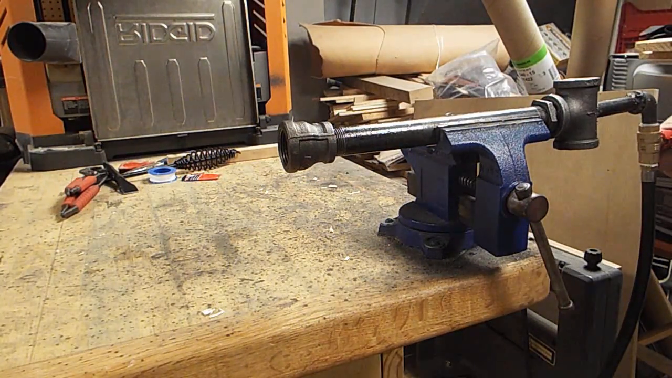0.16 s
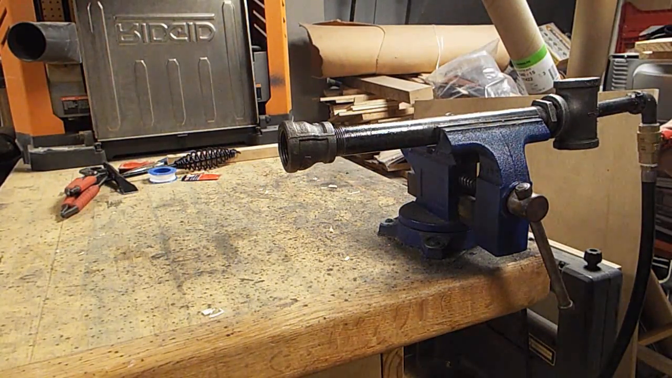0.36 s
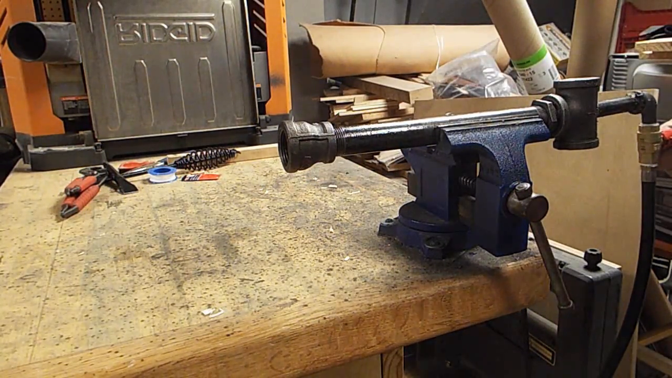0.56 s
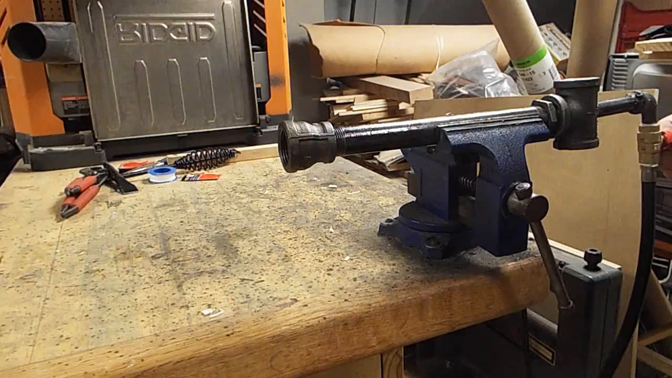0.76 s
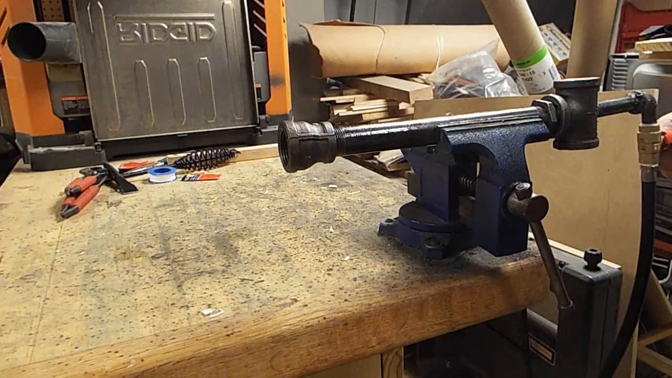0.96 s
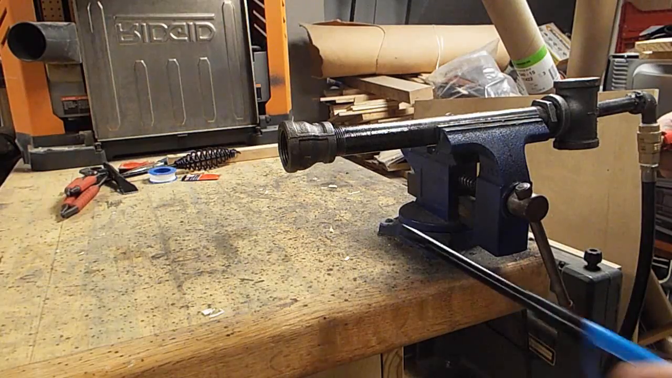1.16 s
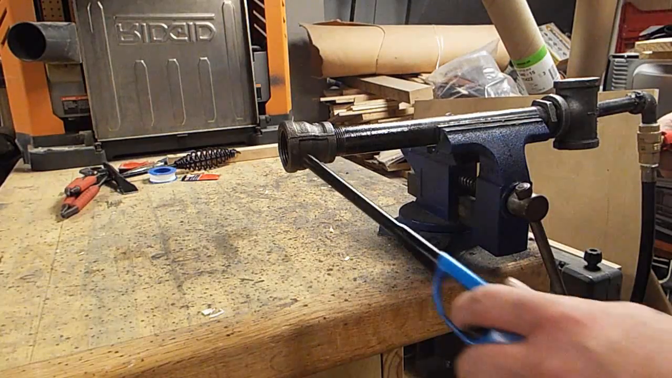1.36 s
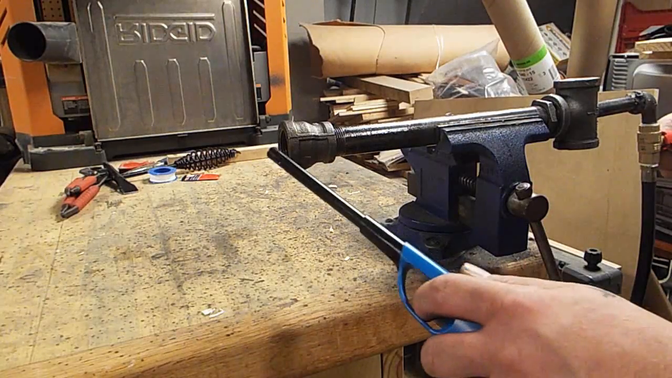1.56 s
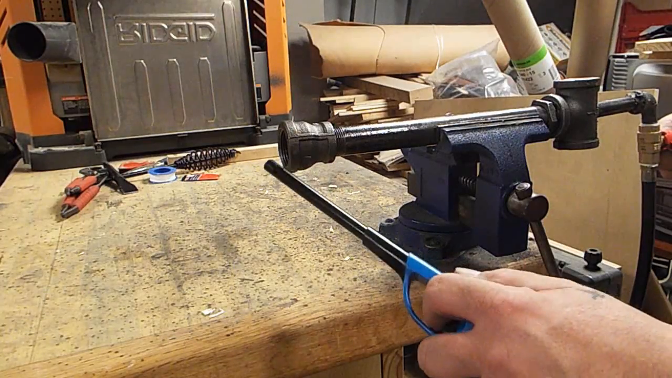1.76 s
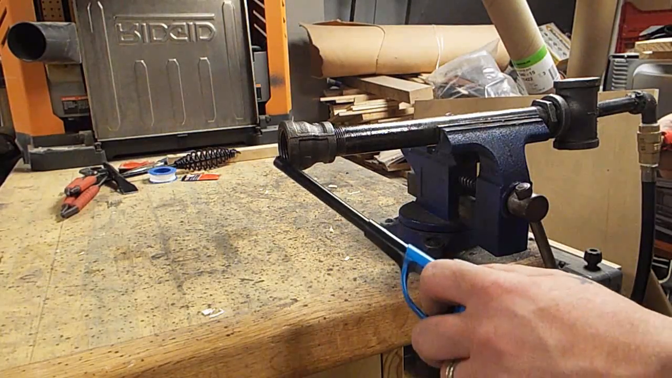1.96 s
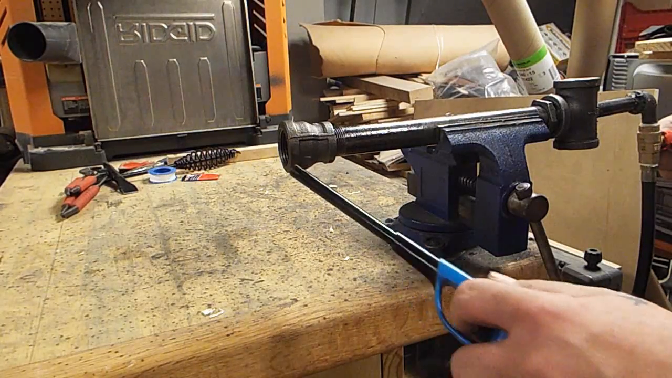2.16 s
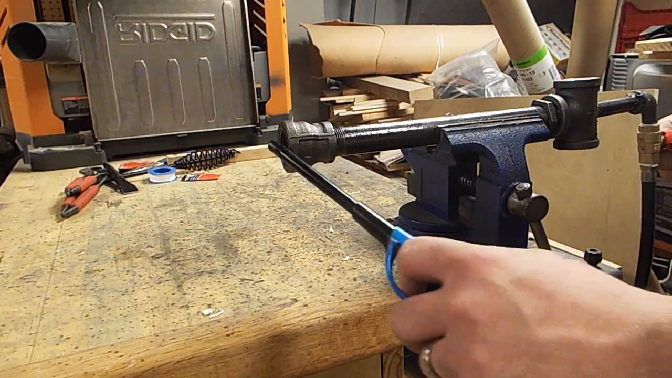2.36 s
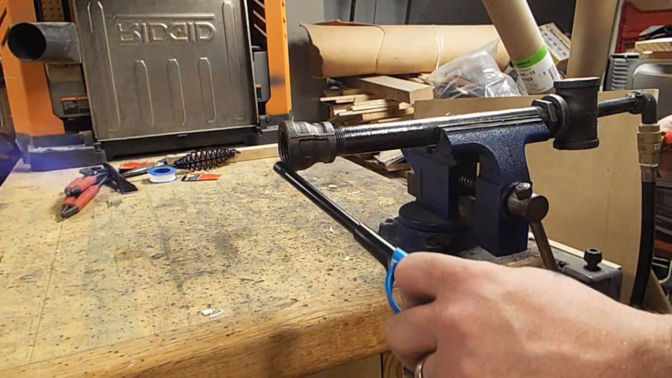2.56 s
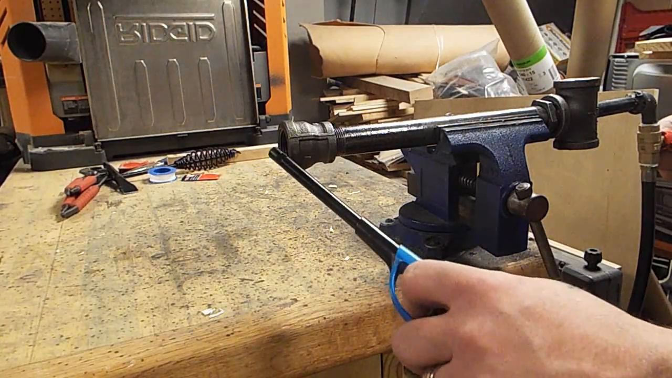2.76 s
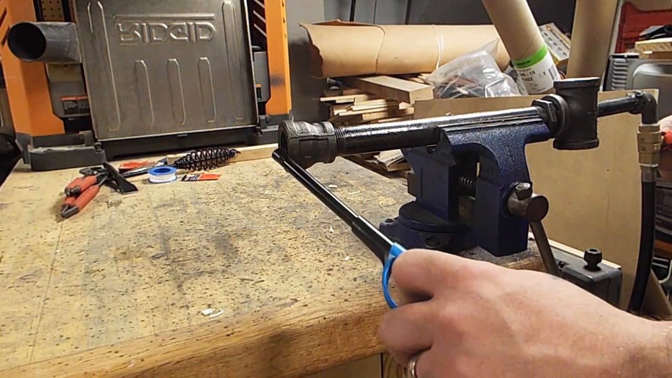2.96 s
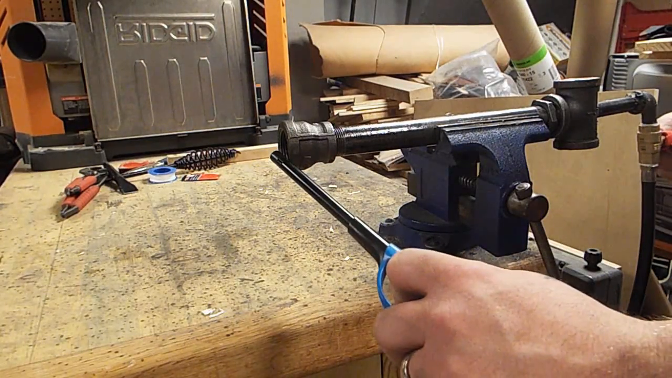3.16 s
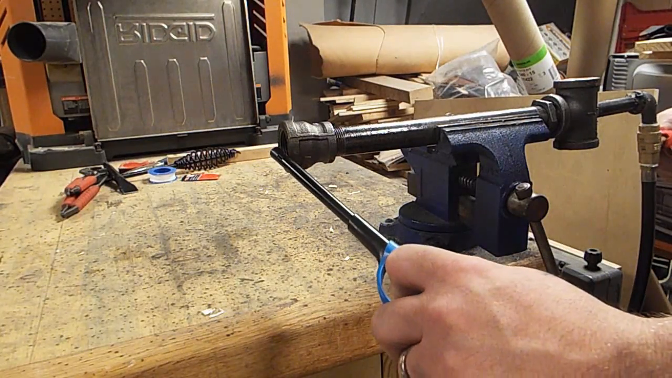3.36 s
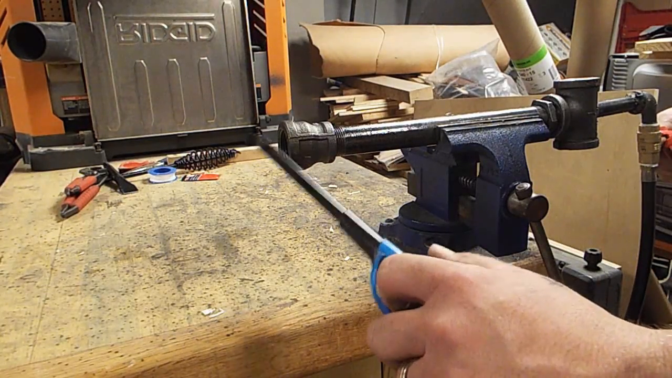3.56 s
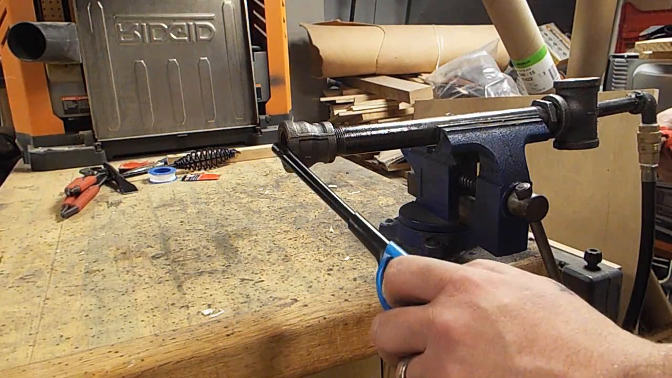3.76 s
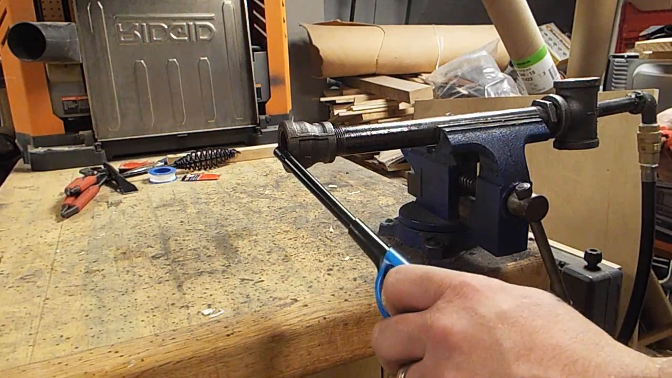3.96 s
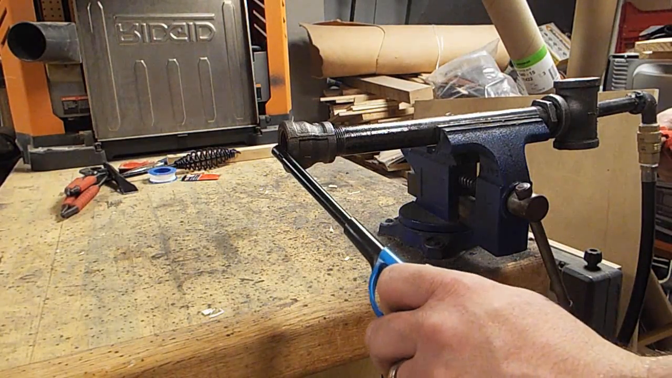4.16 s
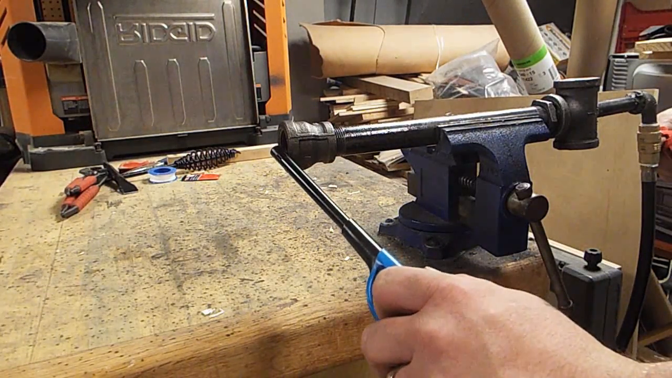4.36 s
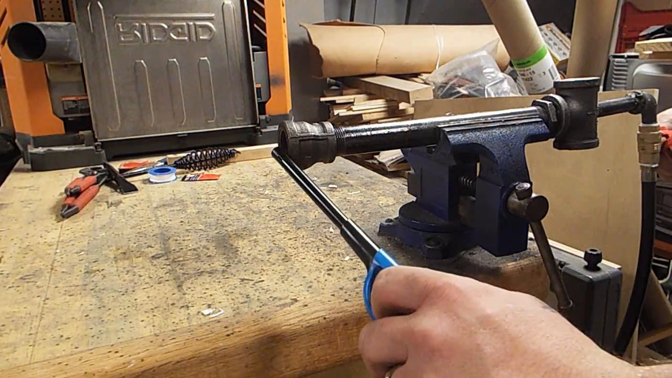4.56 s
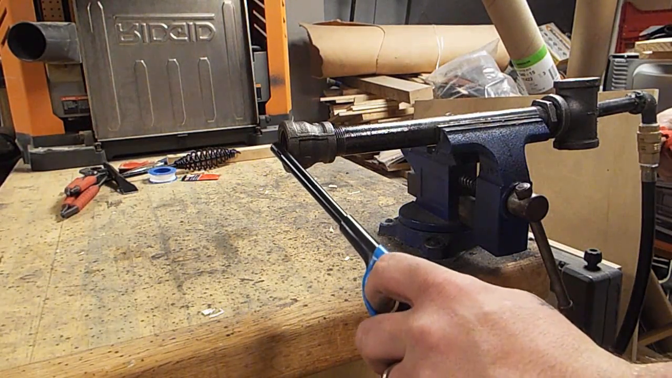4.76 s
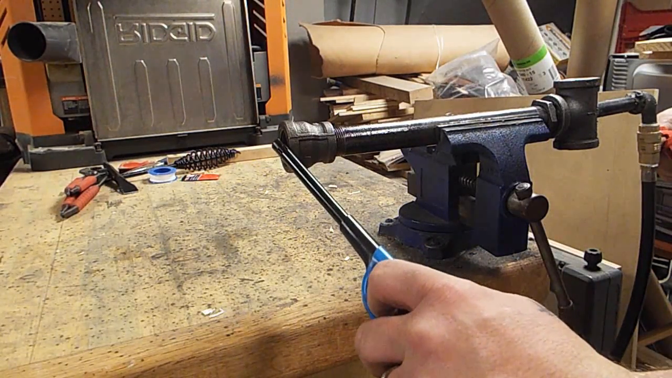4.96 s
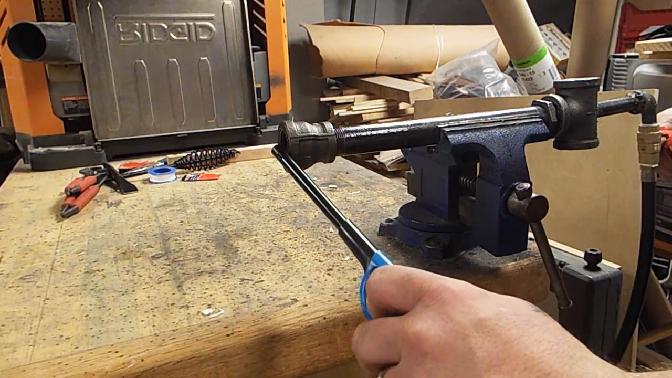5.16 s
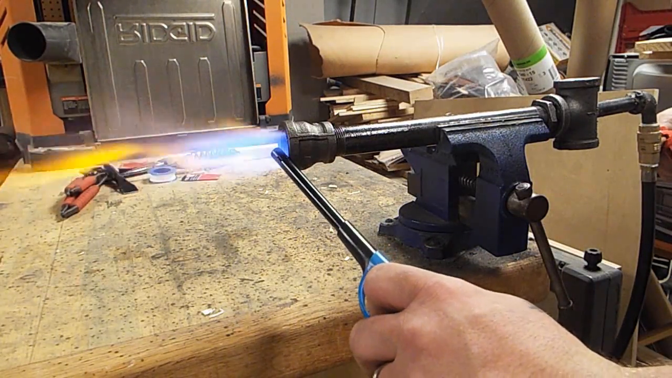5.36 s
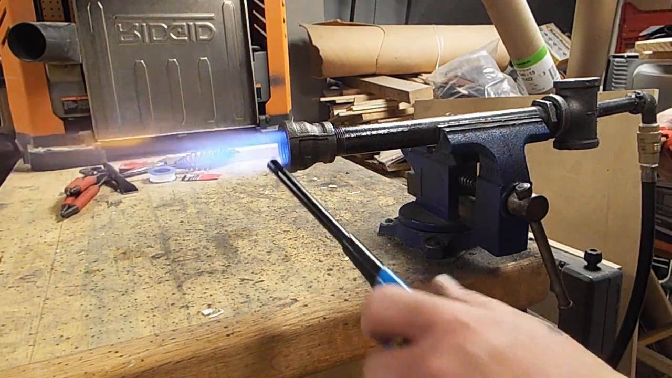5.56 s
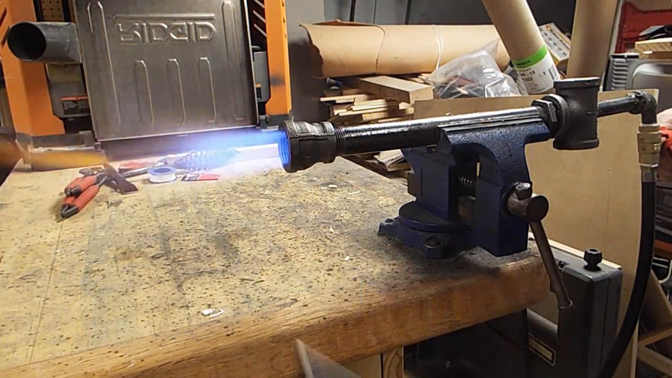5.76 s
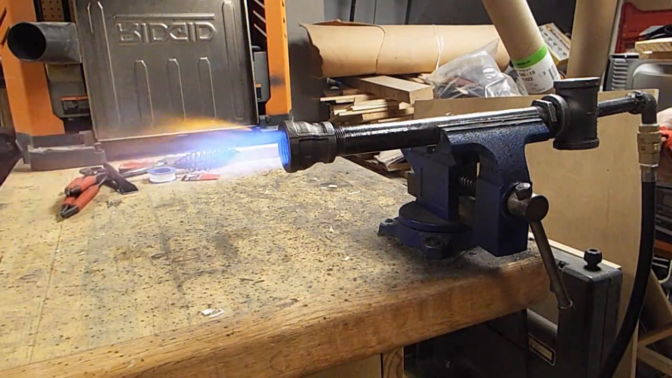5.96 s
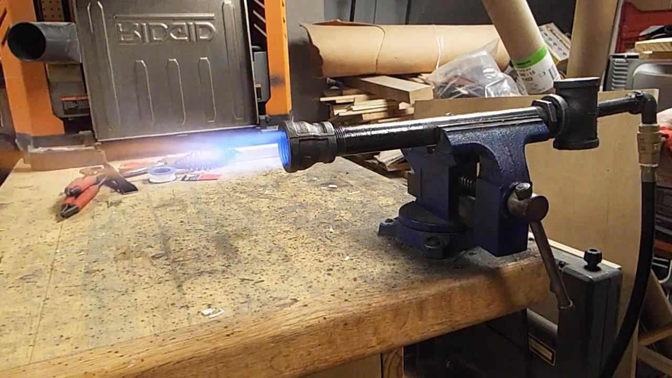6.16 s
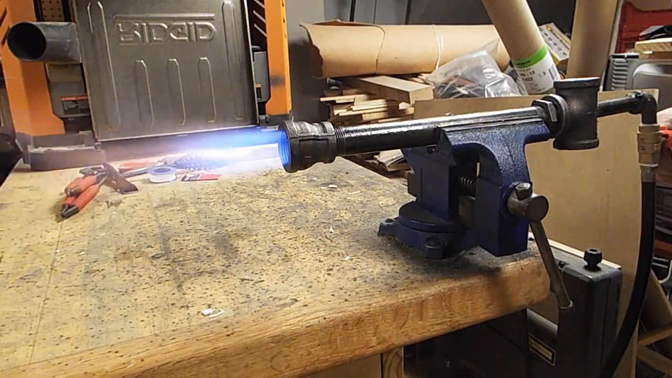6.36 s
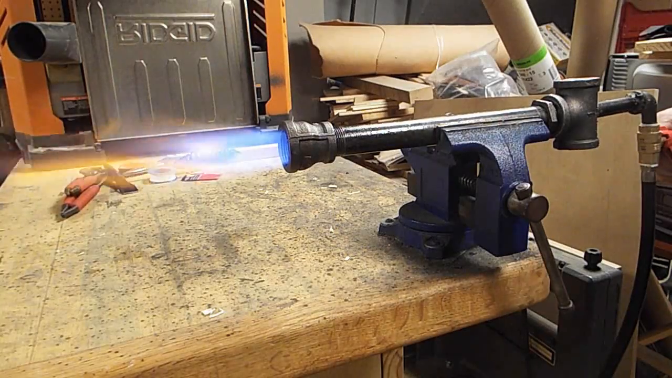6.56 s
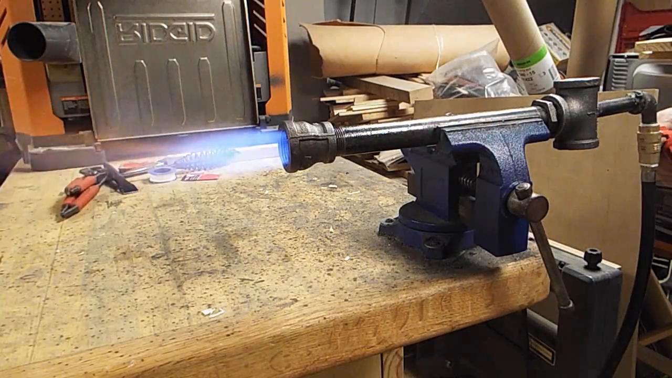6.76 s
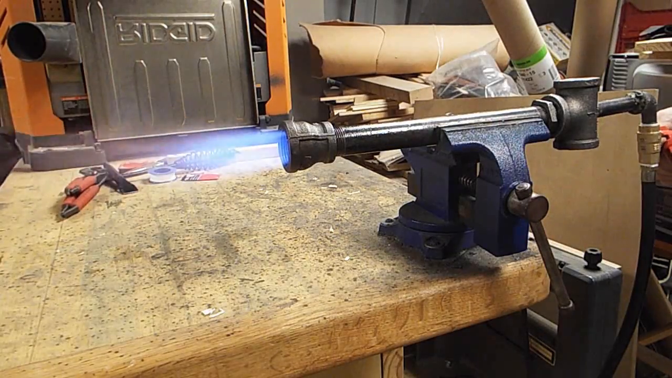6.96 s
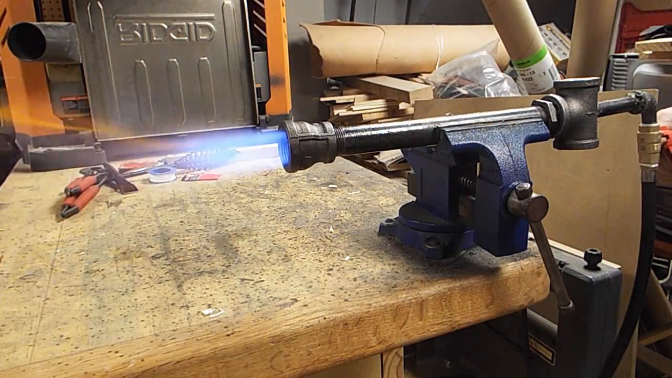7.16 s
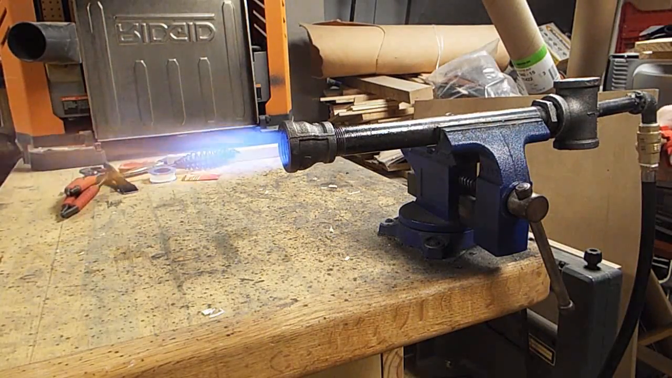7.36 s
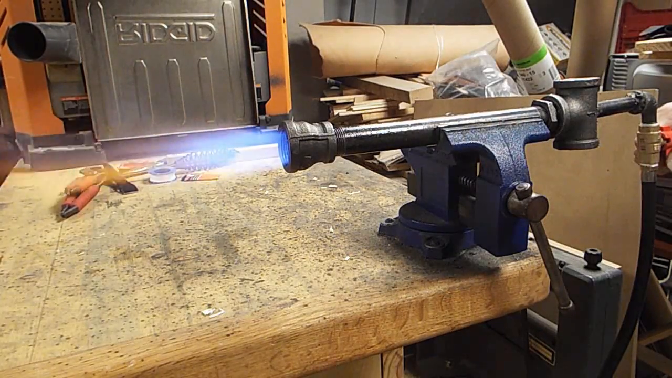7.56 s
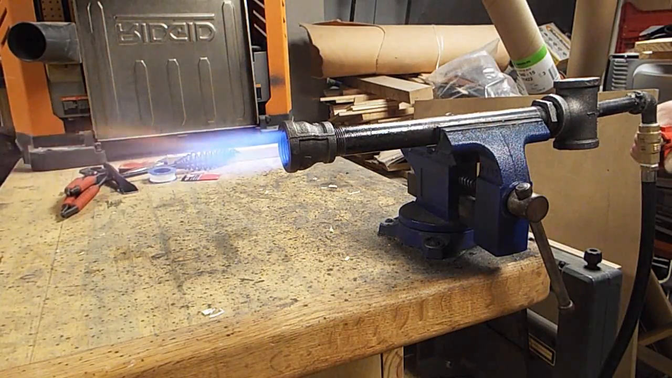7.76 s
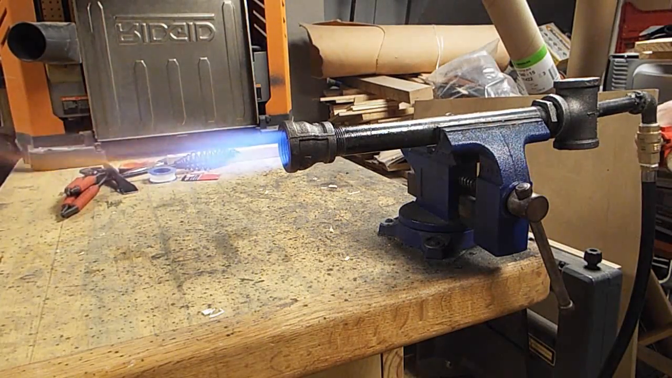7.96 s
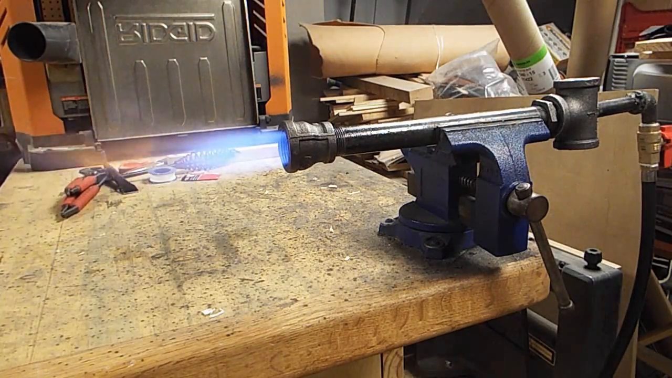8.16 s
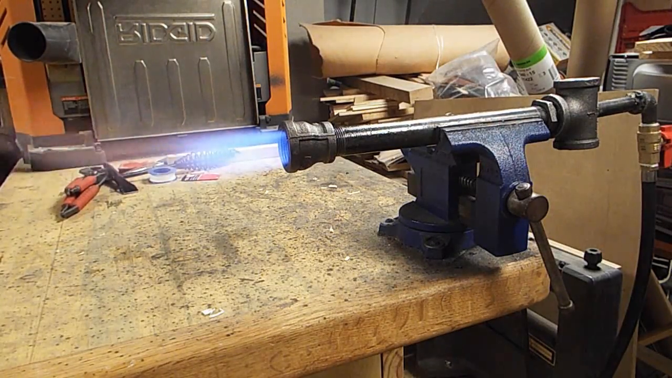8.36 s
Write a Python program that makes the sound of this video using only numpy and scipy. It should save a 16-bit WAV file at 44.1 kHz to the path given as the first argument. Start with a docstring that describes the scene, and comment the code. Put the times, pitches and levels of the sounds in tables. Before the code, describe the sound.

Close up in a small cluttered workshop, faint seeping gas turns into a steady airy hiss. A metallic tap, then a crisp lighter snap and a puff of fire that dies quickly. More trigger scrapes, ticks and snaps bring two more brief whooshes. At last the gas ignites with a low whump and burns in a powerful, steady, rough roar to the end, masking everything else.

```python
"""A gas burner, a pipe clamped in a bench vise, is lit with a piezo lighter in a small workshop.
Gas seeps faintly, then the valve opens and it hisses: noise shaped by the ringing pipe.
The lighter's wand knocks on the burner; its trigger slides, ticks and snaps (blows through a plastic body).
Three snaps light a flame that flares and blows out; the fourth holds and roars (noise that rises and flutters).
Room tone lies under it all, and the workshop answers each click with a short, dense echo."""
import sys
import numpy as np
from scipy import signal
from scipy.fft import rfft, irfft, next_fast_len
from scipy.io import wavfile
from scipy.ndimage import map_coordinates

SR = 44100
rng = np.random.default_rng(int(sys.argv[2]) if len(sys.argv) > 2 else 0)


def file_out(sig):
    """Save sig as 16-bit WAV at sys.argv[1]."""
    # one column per channel
    cols = np.atleast_2d(sig).T
    # limit, then scale
    lim = np.clip(cols, -1, 1)
    pcm = np.round(lim * 32767).astype(np.int16)
    wavfile.write(sys.argv[1], SR, pcm)


N = 371410

# Noise and click spectra are relative: their sounds are scaled to a common size before their level is set.

# The burn each spark lights; delays count from the spark, flares from the catch:
# catch_delay_s, burn_s, roar_db, rush_db, flare_delay_s, flare_db, flare_width_s
BURNS = [(0.02, 0.065, -27.5, -35, 0.054, 7.5, 0.015), (0.0042, 0.11, -23.5, -31, .011, 3, 0.036),
         (0.0092, 0.03, -22, -32, .021, 2, 0.015), (0.0037, 4, -21, -28, .029, 1.5, .45)]
# Turbulent burning: pitch_hz, level_db (per Hz)
FLAME_SPECTRUM = [(20, -32), (80, 0.0), (170, -14), (400, -10.5), (650, -30), (1200, -21), (2000, -13),
                  (3000, -18.5), (5000, -16.5), (6300, -18.5), (7300, -26), (11000, -33), (15600, -49.5)]
# Peaks and dips from the bench and nearby walls: pitch_hz, width_hz, level_db
BENCH_PEAKS = [(167.3, 74, 21.5), (244.7, 40, 13), (340.5, 135, 13), (532.4, 139.5, 19.5), (734, 221, 22.5),
               (908, 19, 12), (1037, 157, 22), (1052.5, 45, -23), (1188, 44, 11), (1277, 41, 8.5),
               (1387, 50, 6.5), (1515, 300, 6.5), (1744, 52, 7), (1910, 76, 6), (2150, 71, 5),
               (2345, 44, 4.4), (2494, 18, 8), (2750, 34, 8.5), (2937, 84, 8.5), (3306, 51, 10.5),
               (3460, 99, 4.5)]
# Stereo spread of the flame: pitch_hz, side_minus_mid_db
FLAME_WIDTH = [(50, -24), (200, -28.5), (700, -31), (1300, -65), (2400, -31), (3700, -18), (5600, -13.5),
               (8500, -13), (13000, -8.5)]
# Air pushed out as the gas catches: pitch_hz, level_db (per Hz)
THUMP_SPECTRUM = [(2, -50), (20, -12), (35, 1), (80, -2.5), (125, -3.5), (170, 4.5), (225, -4.5),
                  (300, -13), (400, -19), (1000, -90)]
# Air swirling after a blow-out: pitch_hz, level_db (per Hz)
DRAUGHT_SPECTRUM = [(2, -30), (9, -4), (16, -2), (30, -17), (70, -30), (300, -70)]
# Every flame catches (time constant) and dies (time to fall 60 dB) alike
CATCH_S, DYING_T60_S = 0.0035, .175
# Thump: level over the roar, time to fall 60 dB
THUMP_DB, THUMP_T60_S = 0.5, 0.86
# The hot puff rolls away: level, time from the end of the burn to its strongest, width
DRAUGHT_DB, DRAUGHT_LAG_S, DRAUGHT_WIDTH_S = -51.5, 0.15, 0.21

# Gas hiss before the pipe shapes it: pitch_hz, level_db (per Hz)
JET_SPECTRUM = [(300, -6.5), (480, -6), (800, -24.5), (1050, -13.5), (2200, -6.9), (3000, -6), (5000, -4),
                (6300, 0), (7300, -7.5), (10800, -6), (13000, -14.5), (15600, -25)]
# Peaks of the burner tube: pitch_hz, width_hz, level_db
PIPE_PEAKS = [(557, 75, 20), (763, 84, 12), (1067, 300, 10.5), (1098, 9.2, 16), (1556, 170, 12),
              (1915, 120, 10), (2249, 234, 12.5), (2580, 29, 12), (2755, 160, 9), (3240, 58, 9.5),
              (3720, 130, 8.5), (4000, 110, 3.5), (4193, 72, 13.5), (4400, 92, 8.5), (4760, 130, 10.5),
              (5170, 180, 11.5), (5640, 110, 10.5), (5830, 26, 14.5), (6240, 65, 10.5), (6500, 44, 11),
              (7370, 160, 5), (7827, 47, 7)]
# Stereo spread of the gas jet, also the basis for the echoes: pitch_hz, side_minus_mid_db
JET_WIDTH = [(400, -21), (1300, -25), (2400, -27), (3700, -14), (5600, -12.5), (8500, -8), (13000, -5.5)]
# Gas seeping before the valve opens: pitch_hz, level_db (per Hz)
SEEP_SPECTRUM = [(100, -24), (400, -1), (800, -6), (1080, 3), (1300, -1.5), (2300, 0.5), (3000, -1),
                 (5500, 0.5), (6500, -1), (7500, -18), (11000, -23), (16000, -28)]
# Valve: start of opening, time it takes, and level of the jet before its bass is cut
OPEN_S, OPENING_S, HISS_DB = 0.677, .15, -45.4
# Pressure stored in the hose adds a surge that settles (time constant)
SURGE_DB, SETTLE_S = 1.5, 0.26
# Seeping: level, rise time constant
SEEP_DB, SEEP_RISE_S = -66, 0.024
# The seeping swells once as the valve is turned: time, width, boost
SWELL_S, SWELL_WIDTH_S, SWELL_DB = .39, 0.087, 6.5

# The piezo hammer fires: start_s, level_db
SPARKS = [(1.7998, 11), (2.4261, 10), (4.0067, 9.5), (5.1774, 8.5)]
# Hammer in the plastic body: pitch_hz, level_db (per Hz)
SNAP_SPECTRUM = [(100, -39), (800, -29), (1400, -15.5), (1900, -9.5), (2400, 2.5), (3000, -4.5),
                 (3600, -10), (5000, -8.5), (6200, -11.5), (9500, -12.5), (12000, -18.5), (16000, -45)]
# The trigger hits its stops: start_s, level_db, pitch_hz
TICKS = [(2.1038, -15.5, 3530), (2.869, -13.5, 2690), (2.959, -18, 2740), (3.5597, -3.5, 2710),
         (3.7063, -3.5, 2920), (3.88, -12.5, 2750), (4.431, -12, 2660), (5.55, -2, 4400)]
# Trigger sound: multiple_of_pitch (no unit), level_db (per Hz)
TRIGGER_SPECTRUM = [(.05, -33), (.35, -29.5), (.6, -13), (.8, -10.5), (1, 1), (1.25, -5.5), (1.6, -7.5),
                    (2.2, -14.5), (3.2, -23), (5.5, -33)]
# The trigger slides in its guide: start_s, level_db, t60_s (time to fall 60 dB)
SLIDES = [(2.019, -14, .12), (2.051, -13.5, .09), (2.41, -13, .035), (3.558, -4.5, 0.018)]
# Scraping shares run from 0 to 1
TICK_SCRAPING, TICK_T60_S = 0.64, .008
SLIDE_SCRAPING, SLIDE_HZ = 0.89, 2500
# Grip creaks while the lighter is held up: time span, middle level and middle pitch
GRIP_FROM_S, GRIP_UNTIL_S, CREAK_DB, CREAK_HZ = 1.4, 4.8, -25, 2750

# Ringing of the clamped pipe, before its soft onset: pitch_hz, level_db, t60_s
TOUCH_MODES = [(168, -51, 0.14), (387, -47, .11), (627, -33, 0.12), (700, -40, 0.13), (3170, -51, .08)]
# Contact noise of the wand: pitch_hz, level_db (per Hz)
KNOCK_SPECTRUM = [(60, -17), (170, 0), (400, 1), (750, 1), (1000, -4), (2200, 1), (3500, 5.5), (5500, -13),
                  (8000, -7), (16000, -28)]

# How fast the workshop's echo dies: pitch_hz, t60_s
WALLS = [(300, 0.43), (1500, 0.079), (4000, 0.17), (8000, 0.17), (15000, 0.18)]
# Tone of the reflected sound: pitch_hz, level_db
ANSWER_TONE = [(300, -2), (1000, -0.5), (1900, 2.5), (2500, -7.5), (3600, -2.5), (5000, 3), (7000, 1),
               (9000, -3), (15000, -3.5)]
# Burner and lighter, left against right: pitch_hz, left_minus_right_db
LEFTWARD = [(60, 1.0), (120, 0.5), (240, 0.5), (480, 0.5), (950, 0.0), (1890, 0.0), (3770, 1.0),
            (7520, 0.0), (15000, -0.5)]
# Room tone: pitch_hz, level_db (per Hz)
AMBIENT_SPECTRUM = [(20, 2.5), (45, -16), (60, 8.5), (80, -7.5), (170, -6.5), (300, -14), (700, -18),
                    (2000, -29), (8000, -30), (16000, -39)]
# Stereo spread of sound from all around: pitch_hz, side_minus_mid_db
DIFFUSE_WIDTH = [(45, -5), (120, -5), (400, -1), (2000, -11), (4000, -6), (8500, -3)]
TOP_HZ = 15950  # nothing is kept from here up


def flame():
    """Burning gas makes a low, fluttering roar and a steadier rush; catching and dying push air around."""
    t = np.arange(N) / SR
    burning = noise(FLAME_SPECTRUM, FLAME_WIDTH, BENCH_PEAKS, ripple_db=3.5)
    low = filtered(burning, lambda hz: 1 / (1 + (hz / 800) ** 4))
    high = burning - low
    roar_gain, rush_gain, thump_gain, draught_gain = np.zeros((4, N))
    for (spark_s, _), burn in zip(SPARKS, BURNS):
        catch_delay, burn_s, roar_db, rush_db, flare_delay, flare_db, flare_width = burn
        age = np.maximum(t - spark_s - catch_delay, 0)
        dying = amp(-60 * np.maximum(age - burn_s, 0) / DYING_T60_S)
        alight = (1 - np.exp(-age / CATCH_S)) * dying
        flare = flare_db * np.exp(-((age - flare_delay) / flare_width) ** 2)  # pooled gas burns off
        roar_gain += alight * amp(roar_db + flare)
        rush_gain += alight * amp(rush_db + 0.82 * flare)
        thump_gain += alight * amp(roar_db + flare - 60 * age / THUMP_T60_S)
        puff = np.exp(-((age - burn_s - DRAUGHT_LAG_S) / DRAUGHT_WIDTH_S) ** 2)
        draught_gain += (age > 0) * puff
    roar = unit(low) * roar_gain * amp(0.7 * wobble(22))
    rush = unit(high) * rush_gain * amp(0.14 * wobble(9) + 0.64 * wobble(350))
    thump = noise(THUMP_SPECTRUM, FLAME_WIDTH) * thump_gain * amp(THUMP_DB)
    draught = noise(DRAUGHT_SPECTRUM, FLAME_WIDTH) * draught_gain * amp(DRAUGHT_DB)
    return roar + rush + thump + draught


def gas():
    """The jet makes the air in the tube ring; seeping gives way to it as the valve opens."""
    t = np.arange(N) / SR
    jet = noise(JET_SPECTRUM, JET_WIDTH, PIPE_PEAKS, ripple_db=2.2)
    # The tube radiates little below its first resonance
    hiss = filtered(jet, lambda hz: 1 - 1 / (1 + (hz / 330) ** 4))
    opening = np.sin(np.pi / 2 * np.clip((t - OPEN_S) / OPENING_S, 0, 1)) ** 2
    surge_db = SURGE_DB * np.exp(-np.maximum(t - OPEN_S - OPENING_S, 0) / SETTLE_S)
    hiss_gain = opening * amp(HISS_DB + surge_db + 0.26 * wobble(15))

    seep = noise(SEEP_SPECTRUM, DIFFUSE_WIDTH, ripple_db=3.0)
    swell_db = SWELL_DB * np.exp(-((t - SWELL_S) / SWELL_WIDTH_S) ** 2)
    seeping = (1 - np.exp(-t / SEEP_RISE_S)) * (1 - opening)
    return hiss * hiss_gain + seep * seeping * amp(SEEP_DB + swell_db)


def lighter():
    """Piezo snaps crack through the plastic body; trigger and grip give smaller ticks and scrapes."""
    track = np.zeros((2, N))
    for start_s, level_db in SPARKS:
        snap = click(SNAP_SPECTRUM, scraping=.12, t60=.01)
        add(track, start_s, in_workshop(amp(level_db) * snap, wet_db=-0.3))
    ticks = [(*tick, TICK_SCRAPING, TICK_T60_S) for tick in TICKS + creaks(count=4)]
    slides = [(start_s, level_db, SLIDE_HZ, SLIDE_SCRAPING, t60) for start_s, level_db, t60 in SLIDES]
    for start_s, level_db, pitch_hz, scraping, t60 in ticks + slides:
        body = np.array(TRIGGER_SPECTRUM) * [pitch_hz, 1]
        contact = click(body, scraping, t60)
        add(track, start_s, in_workshop(amp(level_db) * contact, wet_db=1.3))
    return track


def creaks(count):
    """Faint grip ticks at random times, forces and pitches: rows of start_s, level_db, pitch_hz."""
    rows = []
    for when, force, pitch in rng.random((count, 3)):
        start_s = GRIP_FROM_S + when * (GRIP_UNTIL_S - GRIP_FROM_S)
        level_db = CREAK_DB + 6 * (force - .5)
        rows.append((start_s, level_db, CREAK_HZ * 2 ** ((pitch - .5) / 2)))
    return rows


def touch():
    """The tip of the wand knocks on the burner's mouth, and the clamped pipe rings in damped tones."""
    track, t = np.zeros((2, N)), np.arange(SR // 4) / SR
    knock = amp(-9.5) * click(KNOCK_SPECTRUM, scraping=1.0, t60=.045)
    add(track, 1.432, in_workshop(knock, wet_db=1.0))
    ringing = ring(TOUCH_MODES, t) * (1 - np.exp(-t / .005))  # soft onset
    add(track, 1.434, in_workshop(ringing, wet_db=-12))
    return track


def click(spectrum, scraping, t60):
    """A contact of unit energy: one sharp blow plus dying scrapes, through a body with this spectrum."""
    size = 4096  # samples
    t = np.arange(size) / SR
    cepstrum = irfft(np.log(amp(along(spectrum, np.fft.rfftfreq(size, 1 / SR)))))
    # Minimum phase: nothing sounds before the blow
    body = np.exp(rfft(2 * cepstrum * (t < t[size // 2])))
    scrapes = unit(rng.standard_normal(size) * amp(-60 * t / t60))
    force = np.sqrt(scraping / size) * scrapes
    force[0] += np.sqrt(1 - scraping)
    sound = irfft(rfft(force) * body)
    return sound / np.linalg.norm(sound)


def ring(modes, t):
    """A struck solid sounds several pure tones, each fading at its own pace."""
    return sum(amp(level_db - 60 * t / t60) * np.sin(2 * np.pi * hz * t) for hz, level_db, t60 in modes)


def in_workshop(x, wet_db, gap=.0045):
    """A short sound and, after a gap in seconds, the dense fading answer of the shelves and walls."""
    hz, t, z = signal.stft(rng.standard_normal((2, SR // 3)), SR, nperseg=256)
    fading = amp(-60 * t / along(WALLS, hz)[:, None])  # each pitch dies at its own pace
    mid, side = signal.istft(z * fading, SR, nperseg=256)[1]
    side = filtered(side, lambda hz: amp(along(JET_WIDTH, hz) + 3.5))
    echo = np.array([mid + side, mid - side]) / np.linalg.norm(mid)
    tail = filtered(echo, lambda hz: amp(along(ANSWER_TONE, hz) + wet_db))
    response = np.pad(tail, ((0, 0), (round(gap * SR), 0)))
    response[:, 0] = 1  # the direct sound
    return signal.fftconvolve(x[None], response, axes=1)


def room_tone():
    """The workshop's quiet background: steady noise, strongest in the bass, from all around."""
    return amp(-59.0) * noise(AMBIENT_SPECTRUM, DIFFUSE_WIDTH)


def noise(spectrum, width, peaks=(), ripple_db=0):
    """Coloured stereo noise of rms 1; many crossing sound paths ripple the treble of mid and side."""
    hz_grid = np.arange(0, SR / 2, 45)
    treble = 1 / (1 + (3500 / (hz_grid + 1)) ** 4)
    ripples = ripple_db * rng.standard_normal((2, len(hz_grid))) * treble

    def response(hz):
        """The smooth colour with separate random ripples for mid and side."""
        return colour(spectrum, peaks, hz) * amp([np.interp(hz, hz_grid, r) for r in ripples])

    mid, side = filtered(rng.standard_normal((2, N)), response)
    side = filtered(side, lambda hz: amp(along(width, hz)))
    return unit(np.array([mid + side, mid - side]))


def colour(spectrum, peaks, hz):
    """Gain of a smooth spectrum with bell-shaped peaks and dips."""
    grid = np.linspace(0, SR / 2, 8192)
    bells = sum(db * .5 ** ((2 * (grid - centre) / width) ** 2) for centre, width, db in peaks)
    return amp(np.interp(hz, grid, along(spectrum, grid) + bells))


def filtered(x, response):
    """Change the strength of each frequency in x by the gain that response gives for it."""
    n = x.shape[-1]
    m = next_fast_len(n + 8192)  # spare room at the end
    return irfft(rfft(x, m) * response(np.fft.rfftfreq(m, 1 / SR)), m)[..., :n]


def wobble(rate):
    """A smooth curve through random points, rate points a second."""
    points = rng.standard_normal(int(N * rate / SR) + 4)
    return map_coordinates(points, [np.arange(N) * rate / SR])


def along(points, hz):
    """Read a table of frequency and value, in straight lines over a log frequency axis."""
    f, v = np.transpose(points)
    return np.interp(np.log(hz + 1), np.log(f + 1), v)


def amp(db):
    """Turn decibels into gain."""
    return 10 ** (np.asarray(db) / 20)


def unit(x):
    """Scale to rms 1."""
    return x / np.sqrt(np.mean(x ** 2) + 1e-20)


def add(track, start_s, sound):
    """Mix a sound into the track, cut off at the track's end."""
    part = track[:, round(start_s * SR):][:, :sound.shape[-1]]
    part += sound[..., :part.shape[-1]]


def scene():
    """Burner and lighter share one stereo balance, mostly a little to the left, over the room tone."""
    bench = flame() + gas() + lighter() + touch()
    halves = np.array([[.5], [-.5]])  # half the difference to each side
    placed = filtered(bench, lambda hz: amp(along(LEFTWARD, hz) * halves))
    return placed + room_tone()


def record(dry):
    """Round off the tallest peaks towards 0.5, then remove everything from TOP_HZ up."""
    held = dry / (1 + np.abs(dry / .5) ** 8) ** (1 / 8)
    return filtered(held, lambda hz: hz < TOP_HZ)


dry = scene()
out = record(dry)
file_out(out)
```